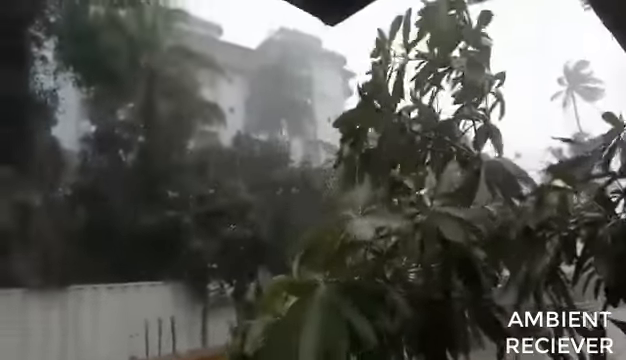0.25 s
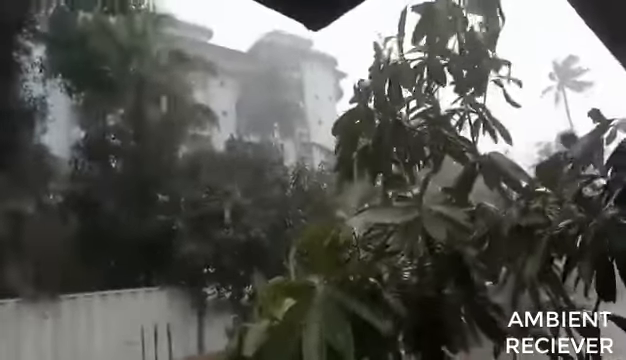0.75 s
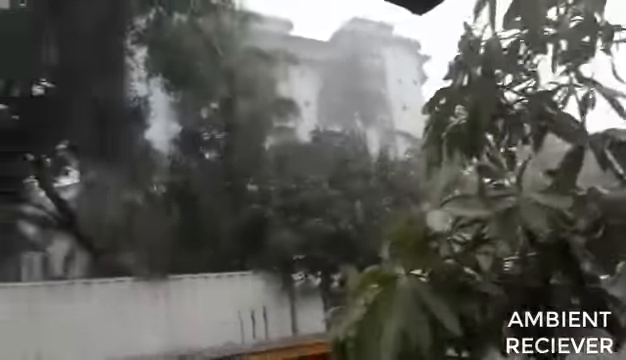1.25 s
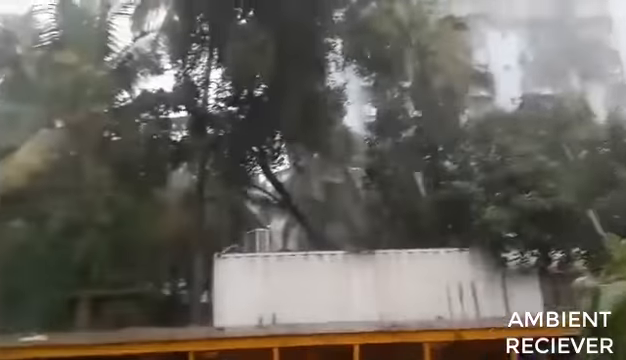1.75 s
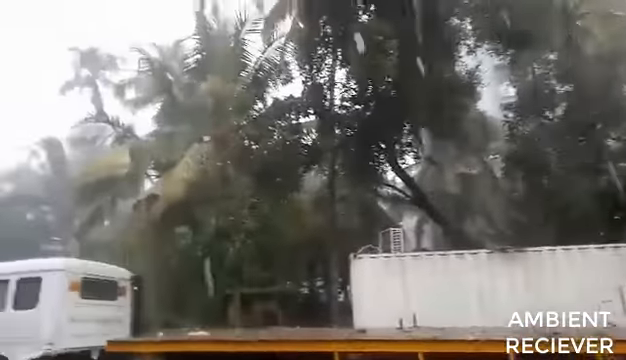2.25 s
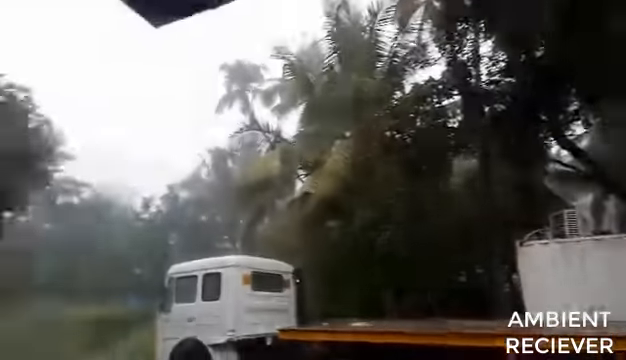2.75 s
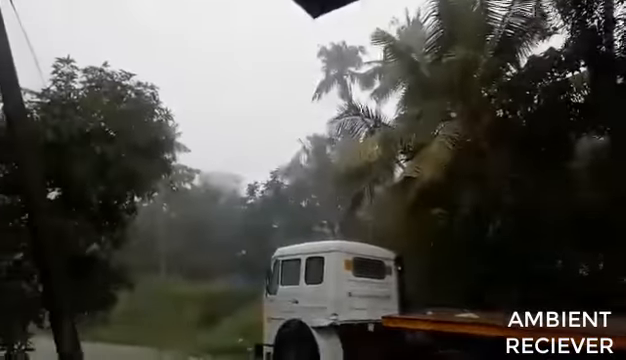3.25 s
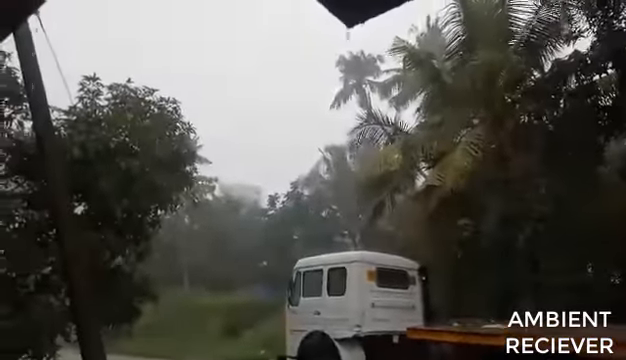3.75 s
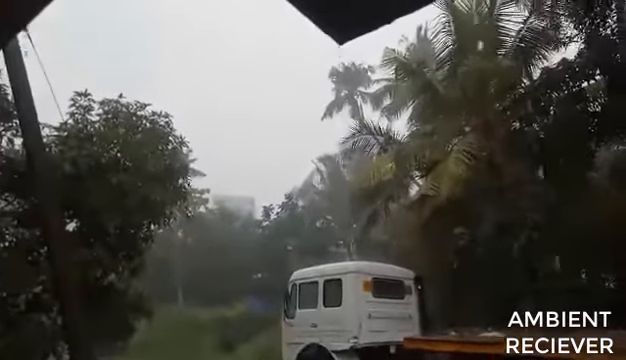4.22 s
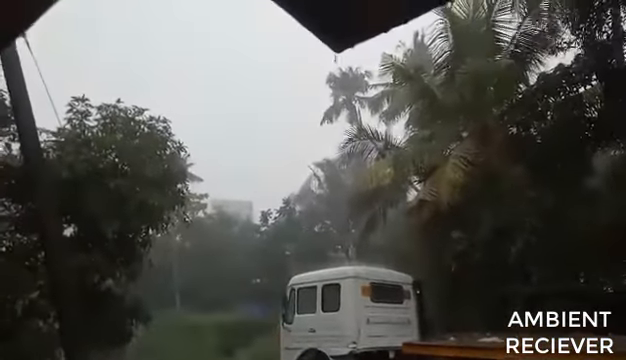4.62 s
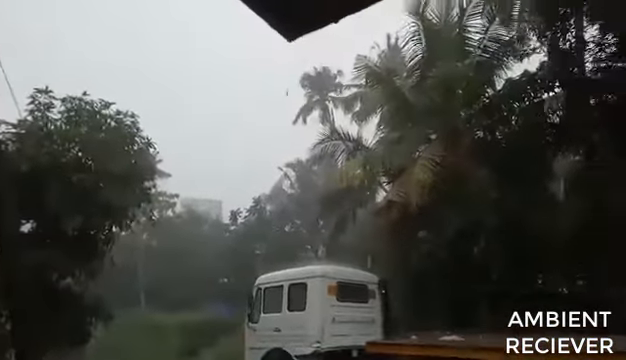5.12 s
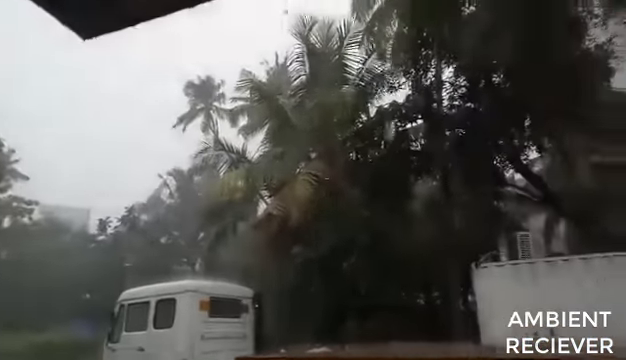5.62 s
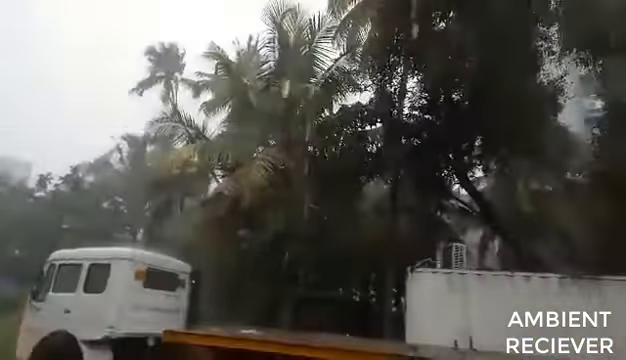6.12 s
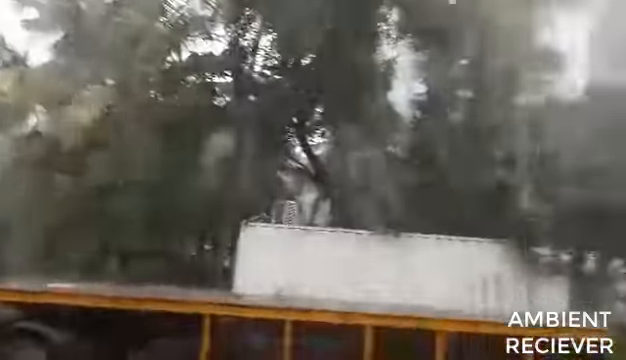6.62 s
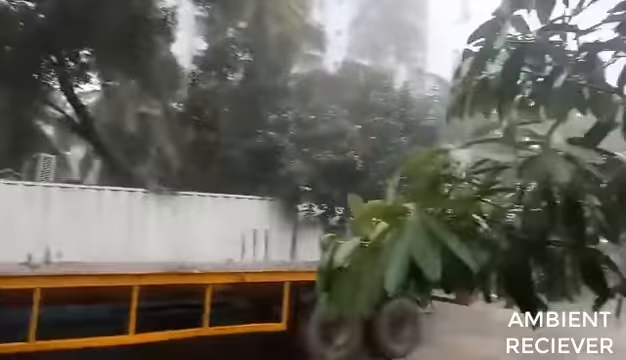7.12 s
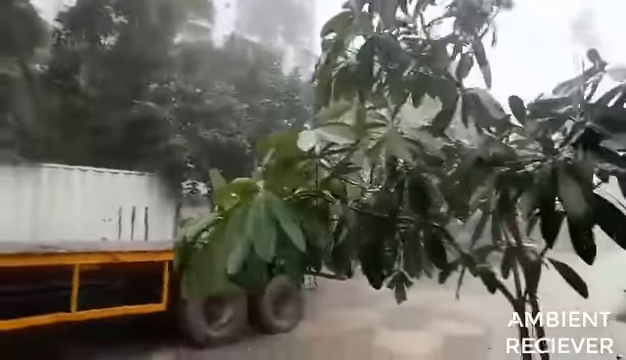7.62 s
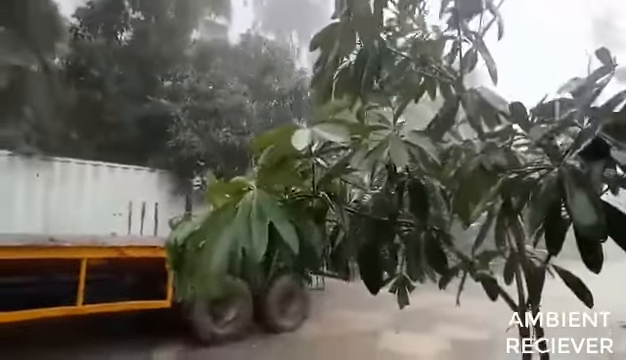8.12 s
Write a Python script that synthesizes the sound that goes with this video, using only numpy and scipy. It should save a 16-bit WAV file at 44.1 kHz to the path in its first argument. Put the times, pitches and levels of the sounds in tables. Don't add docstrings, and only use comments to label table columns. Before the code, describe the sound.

Heavy rain falls continuously outdoors, heard from under a shelter on a small stereo microphone. A dense wash, louder on the left, mixes with leaf ticks, low roof drumming and fine hiss. Single eaves drips plink close by; one knocks the microphone housing near two seconds, and the rain ducks briefly after loud drips. The treble is thin and flickering.

```python
import sys
import numpy as np
from scipy import signal
from scipy.fft import rfft, irfft, dct
from scipy.io import wavfile
from scipy.ndimage import uniform_filter1d

SR = 44100
rng = np.random.default_rng(int(sys.argv[2]) if len(sys.argv) > 2 else 0)


def natural_amplitude(level_db):
    exponent = np.asarray(level_db, float) / 20
    return 10 ** exponent


def generate_wav(sig):
    pcm = np.round(np.clip(np.atleast_2d(sig).T, -1, 1) * 32767).astype(np.int16)
    wavfile.write(sys.argv[1], SR, pcm)


N = 368883
PORT_GAP_M, SOUND_M_PER_S = .19, 343
HOP = 128

# [f/Hz, left level/dB, right level/dB]
SPRAY = [(7600, -4, -7.1), (8600, -3, 3), (8800, -1.5, -1.5), (10500, -3.5, -5.5), (10900, -4, -3.5),
         (11200, -0.5, -10.5), (12500, 0, -18), (13400, 1, -20), (14400, 4, -19), (15000, -7.5, -18),
         (14840, -0.5, -19.5), (14900, -8.1, -17.9)]
# [t/s, peak level/dB, left minus right/dB, spray swell/dB, finest spray swell/dB]
SPLASHES = [(.84, -42, 4, 2.5, 1), (2.55, -42, 4, 2.5, 3), (3.7, -42, 2, 1, 0), (4.1949, -35, 6, 2, -1),
            (4.7566, -38.5, 4.5, 5, 7), (5.3018, -32, 9, 3, 7), (5.4594, -36, 3, 4, -1),
            (5.9894, -36, 3, 1, 4), (7.3394, -39, 10, 1.5, 1), (8.1294, -38, 9, 2, -4),
            (8.29, -40, 4, -3, -7)]
# [t/s, peak level/dB, pitch f/Hz, left minus right/dB, extra force/dB]
HEAVY_DRIP = [
    (1.8496, -10, 2900, 9.5, 10.8),
]


def evened(x):
    return x / np.sqrt(np.mean(x ** 2) + 1e-20)


def smooth(power, size=400):
    return abs(uniform_filter1d(uniform_filter1d(power, size), size))


def column(rows, k, at):
    table = np.array(rows)
    return np.interp(at, table[:, 0], table[:, k])


def apart(pan_db):
    return natural_amplitude(np.array([[pan_db / 2], [-pan_db / 2]]))


def split_at(x, hz, order):
    low = signal.sosfiltfilt(signal.butter(order, hz, fs=SR, output="sos"), x)
    return low, x - low


def colour(rows, hz):
    log_hz, log_rows = np.log(hz + 1), np.log(np.array(rows)[:, 0])
    db = np.array([np.interp(log_hz, log_rows, np.array(rows)[:, k]) for k in (1, 2)])
    below = np.maximum(np.log(rows[0][0] / (hz + 1)), 0)
    above = np.maximum(np.log((hz + 1) / rows[-1][0]), 0)
    return natural_amplitude(np.maximum(db - 30 * (.4 * below + 8 * above), -120))


def diffuse(hz):
    return 0.93 * np.sinc(2 * hz * PORT_GAP_M / SOUND_M_PER_S)


def field(rows, likeness, patch_db, flicker_db, size=1024):
    frames, hz = N // HOP + 20, np.fft.rfftfreq(size, 1 / SR)
    a, b, c, d, patches = rng.standard_normal((frames, len(hz), 5)).T
    patches = uniform_filter1d(patches, size=12, axis=0)
    patches = evened(uniform_filter1d(patches, size=24, axis=1))
    flicker = evened(uniform_filter1d(rng.standard_normal(frames), size=10))
    same = np.clip(likeness(hz), -1, 1)[:, None]
    left = a + 1j * b
    right = same * left + np.sqrt(1 - same ** 2) * (c + 1j * d)
    z = np.array([left, right]) * colour(rows, hz)[:, :, None]
    z *= natural_amplitude(patch_db * patches + flicker_db * flicker)
    out = signal.istft(z, nperseg=size, noverlap=size - HOP)[1][:, :N]
    return out / np.sqrt(np.mean(out.mean(0) ** 2))


def plink(hz, cycles):
    t = np.arange(400) / SR
    return np.sin(2 * np.pi * hz * t) * np.exp(-t * hz / cycles) * np.minimum(t * hz * 2, 1)


def leaves(per_s=900, spread_db=1.5):
    size = natural_amplitude(spread_db * np.minimum(rng.exponential(1, N), 5)) * (rng.random(N) < per_s / SR)
    leaf, out = rng.integers(0, 24, N), np.zeros((2, N))
    pitches, sides = np.geomspace(700, 4200, num=24), rng.uniform(-0.84, 1, 24)
    for k, (hz, side) in enumerate(zip(pitches, sides)):
        tick = signal.oaconvolve(size * (leaf == k), plink(hz, cycles=1.25))[:N]
        late = round(side * PORT_GAP_M / SOUND_M_PER_S * SR)
        out[0] += natural_amplitude(10.0 + 1.8 * side) * tick
        out[1] += natural_amplitude(-8.0 - 4 * side) * np.roll(tick, late)
    return evened(out)


def wash_and_leaves(t, mist_db, flutter_db):
    # [f/Hz, left level/dB, right level/dB]
    wash_colour = [(321, -5, -12.5), (623, -3, -9.5), (1096, -2.5, -11), (1642, -0.5, -12),
                   (2086, -1.6, -13.5), (2540, -5, -13), (4010, -5, -14.5), (4380, -8.5, -16.5),
                   (4950, -14.5, -23.5), (6040, -20.5, -22.5), (6250, -15.5, -22.5), (6880, -16.5, -23),
                   (7040, -25, -16.5), (7484, -21, -29.5)]
    # [t/s, left minus right/dB]
    turning = [(0, 9.5), (2.7, 9), (6, 9), (6.9, 9.5), (7.8, 9), (8.1, 8), (8.36, 7.5)]
    wash = field(wash_colour, diffuse, patch_db=0.46, flicker_db=0.62) + natural_amplitude(-10) * leaves()
    high = signal.butter(4, 4600, "high", fs=SR, output="sos")
    wash += (natural_amplitude(flutter_db) - 1) * signal.sosfiltfilt(high, wash)
    side_db = column(turning, 1, t)
    side_db -= side_db.mean()
    body, treble = split_at(wash, 2300, order=2)
    facing_db = -0.34 * side_db
    return (body + natural_amplitude(mist_db + facing_db) * treble) * natural_amplitude(np.outer([.2, -.8], side_db))


def drumming_roof(t):
    # [f/Hz, left level/dB, right level/dB]
    roof_colour = [(25.1, -5.5, -36), (46.4, -11, -14), (79.2, -0.5, -13), (113.8, 5.5, 0.5),
                   (136.6, 1, -8), (190.4, -7.5, -18.5), (294, -7, -12), (513, -5, -22)]
    # [t/s, level/dB]
    drumming = [(0, -39.5), (1.1, -37.5), (2.4, -38), (3, -39), (3.85, -36), (4.2, -38.5), (4.9, -37.5),
                (6.3, -40.5), (8.36, -36.5)]
    roof = field(roof_colour, diffuse, patch_db=0.43, flicker_db=-1.0, size=2048)
    return natural_amplitude(column(drumming, 1, t) + 2.5) * roof


def fine_spray(t, mist_db, flutter_db):
    spray_db, finest_db = -25.5, -28
    puff_s = 0.028
    spray = field(SPRAY, lambda hz: 0.33 * (hz < 11000), patch_db=1.0, flicker_db=0.5)
    puff_db = np.zeros((2, N))
    for s, _, _, *swell_db in SPLASHES:
        puff_db += np.outer(swell_db, np.exp(-((t - s - .008) / puff_s) ** 2))
    coarse, finest = split_at(spray, 11000, order=6)
    coarse = natural_amplitude(spray_db + mist_db[0] + puff_db[0] + flutter_db[0]) * coarse
    return coarse + natural_amplitude(finest_db + mist_db[1] + puff_db[1] + flutter_db[1]) * finest


def drips():
    # [t/s, peak level/dB, pitch f/Hz, left minus right/dB, extra force/dB]
    eaves_drips = [(0.4934, -17, 2240, 13, -3), (1.3668, -16, 2250, 12, -2), (1.7534, -9.5, 1820, 11, 6),
                   (2.7156, -7, 1540, -4, 8), (3.8184, -7, 1840, 8, 5), (4.1555, -11.5, 3650, 10.0, 0),
                   (4.5094, -18, 3220, 4, 6), (5.0805, -9.5, 1920, 17, 2.5), (5.204, -11, 1670, 9.5, -8),
                   (5.5136, -9, 1540, 9, -1), (6.145, -9, 3500, 17, 2.5), (6.1834, -18, 1900, 7, -4),
                   (6.41, -13, 2780, 12, -2), (6.9484, -19, 2140, 7, -2), (7.5144, -16, 1970, 9, 0),
                   (7.9224, -5, 3750, 8, 3.5)]
    out = np.zeros((2, N + SR))
    for s, db, hz, pan_db, force_db in eaves_drips + HEAVY_DRIP:
        at = round((s + .001) * SR)
        tick = apart(pan_db) * natural_amplitude(db + force_db - 3) * plink(hz, cycles=1.6 - .06 * force_db)
        out[:, at:at + 400] += tick
        out[:, at + 150:at + 550] += natural_amplitude(-7) * tick
    t = np.arange(1500) / SR
    tint = colour(SPRAY, np.fft.rfftfreq(len(t), 1 / SR))
    for s, db, pan_db, _, _ in SPLASHES:
        burst = irfft(tint * rfft(rng.standard_normal((2, len(t)))))
        burst *= np.exp(-t / 0.0063) * np.minimum(t / .003, 1)
        at = round(s * SR)
        out[:, at:at + len(t)] += apart(pan_db) * natural_amplitude(db + 2.5) * burst
    return out[:, :N]


def scene():
    # [t/s, wash level/dB, mist blown in, level over wash/dB]
    rain = [(0, -22.5, -28), (.5, -23, -30), (1, -23.5, -26), (1.5, -23, -28), (2, -23, -29),
            (2.4, -23.5, -27), (2.75, -22.5, -30.5), (3.2, -23, -27.5), (3.6, -24, -27), (3.9, -22.5, -29),
            (4.5, -23, -30), (5.2, -23.5, -30), (5.45, -22.5, -28.5), (6.1, -23, -25.5), (6.9, -23, -27.5),
            (7.6, -23, -27.5), (8.1, -24, -25), (8.36, -23, -25)]
    mist_share = (0.27, 0.53, 1.3)
    flutter_size = (0.5, 0.6, 0.6)
    t = np.arange(N) / SR
    flutter = uniform_filter1d(uniform_filter1d(rng.standard_normal(N), size=1500), size=1500)
    flutter_db = np.outer(flutter_size, evened(flutter))
    mist = column(rain, 2, t)
    mist_db = np.outer(mist_share, mist - mist.mean())
    wash = wash_and_leaves(t, mist_db[0], flutter_db[0])
    spray = fine_spray(t, mist_db[1:], flutter_db[1:])
    return natural_amplitude(column(rain, 1, t) + 0.16) * (wash + spray) + drumming_roof(t) + drips()


def limiter(x, back_db_per_s=190):
    ceiling_db, knock_db = -5.5, 2.5
    peak_db = 20 * np.log10(abs(x).max(0) + 1e-9)
    peak_db[round((HEAVY_DRIP[0][0] + .003) * SR)] = knock_db
    fall = np.arange(N) * back_db_per_s / SR
    held_db = np.maximum.accumulate(peak_db + fall) - fall
    over_db = np.maximum(held_db - ceiling_db, 0)
    return x / natural_amplitude(uniform_filter1d(over_db, size=500, origin=245))


def edge_tone():
    # [from t/s, to t/s, f/Hz, level/dB]
    whistle = (5.24, 5.39, 15187, -55.5)
    start, end, hz, db = whistle
    t = np.arange(N) / SR
    swell_db = 14 * np.exp(-((t - 5.31) / .009) ** 2)
    return natural_amplitude(db + swell_db) * (t > start) * (t < end) * np.sin(2 * np.pi * hz * t)


def starved_bands(x, wobble_db=2.0):
    # [f/Hz, level over step/dB]
    link_fineness = [(300, 8), (1000, 1), (3000, -5.5), (4300, -6), (5200, -8.4), (6500, -7.8), (7400, -10),
                     (7700, -2), (8200, -2), (8400, -9), (10800, -9), (11300, -6.8), (15000, -6.8)]
    m, first = 1882, 1084
    h, lead = m // 2, 2 * m - first
    window = np.sin(np.pi * (np.arange(2 * m) + .5) / (2 * m))
    padded = np.pad(x, ((0, 0), (lead, 3 * m)))
    frames = np.lib.stride_tricks.sliding_window_view(padded, 2 * m, axis=1)[:, ::m] * window
    a, b, c, d = np.split(frames, 4, axis=2)
    z = dct(np.concatenate([-c[..., ::-1] - d, a - b[..., ::-1]], axis=2), type=4, norm="ortho")
    hz, t = (np.arange(m) + .5) * SR / (2 * m), (np.arange(z.shape[1]) * m + m - lead) / SR

    power = uniform_filter1d(uniform_filter1d(z ** 2, size=44, axis=2), size=5, axis=1)
    level = np.sqrt(power + 1e-16)
    wobble = np.repeat(rng.standard_normal((2, len(t), m // 16 + 1)), 16, axis=2)[..., :m]
    step = level / natural_amplitude(column(link_fineness, 1, hz) + wobble_db * wobble)
    step[:, abs(t - HEAVY_DRIP[0][0]) < m / SR, :m // 3] /= 5
    step[1, :, hz > 11000] *= natural_amplitude(1.2)
    z = np.sign(z) * np.floor(abs(z) / step + .4) * step

    thin = (hz > 7700) & (hz < 8260)
    band_db = 10 * np.log10((z[..., thin] ** 2).mean((0, 2)) + 1e-12)
    band_db = uniform_filter1d(band_db + 4 * rng.standard_normal(len(t)), size=2)
    band_db -= uniform_filter1d(band_db, size=9)
    kept = band_db > np.quantile(band_db, 1 - .24)
    gap_from_hz = rng.choice([7250, 7450, 7600, 7600, 7600, 7600], (len(t), 1))
    band_top_hz = rng.choice([8150, 8150, 8150, 8260], (len(t), 1))
    z[..., thin] *= natural_amplitude(4.0)
    z *= (kept[:, None] & (hz < band_top_hz)) | (hz < gap_from_hz) | (hz > 8260)
    z *= hz < rng.choice([14500, 14500, 14500, 14850, 15180, 15180, 15180], (2, len(t), 1))

    u = dct(z, type=4, norm="ortho")
    late, early = u[..., :h], u[..., h:]
    frames = np.concatenate([early, -early[..., ::-1], -late[..., ::-1], -late], axis=2) * window
    out = (frames[:, 1:, :m] + frames[:, :-1, m:]).reshape(2, -1)[:, lead - m:][:, :N]

    high = signal.butter(8, 8300, "high", fs=SR, output="sos")
    true, rounded = signal.sosfiltfilt(high, x), signal.sosfiltfilt(high, out)
    follow = np.sqrt(smooth(true ** 2) / (smooth(rounded ** 2) + 1e-14) + 1e-14)
    out += rounded * (np.minimum(follow, 3) - 1)
    out[0] += edge_tone()
    return out


def band_limit(x):
    return signal.sosfilt(signal.butter(12, 15440, fs=SR, output="sos"), x)


def record(dry):
    mix = starved_bands(limiter(dry))
    return band_limit(mix)


dry = scene()
out = record(dry)
generate_wav(out)
```